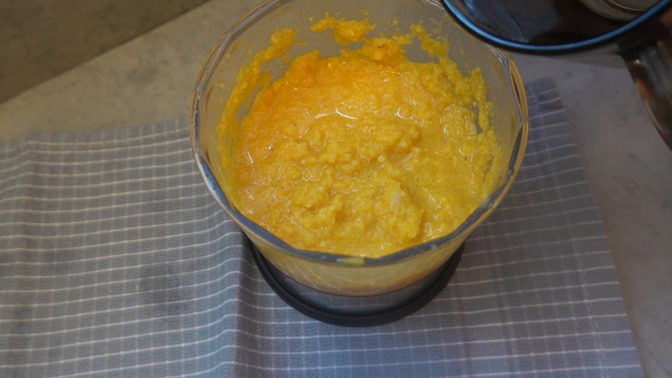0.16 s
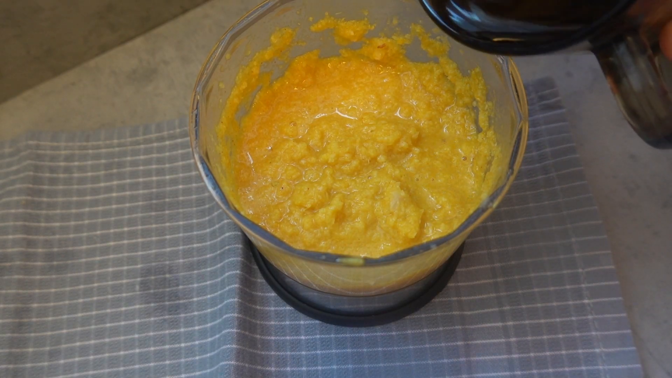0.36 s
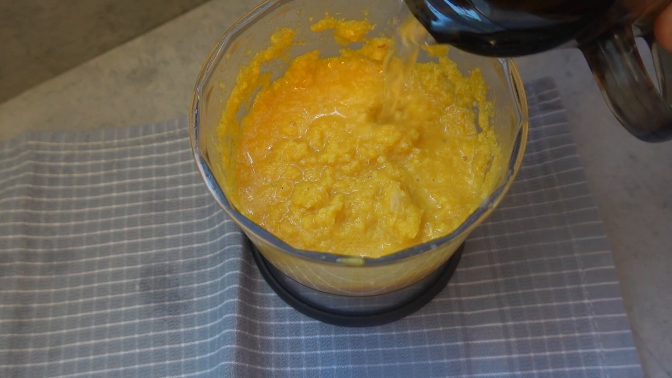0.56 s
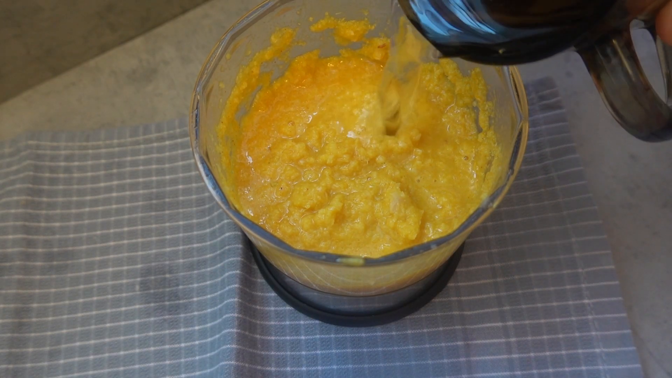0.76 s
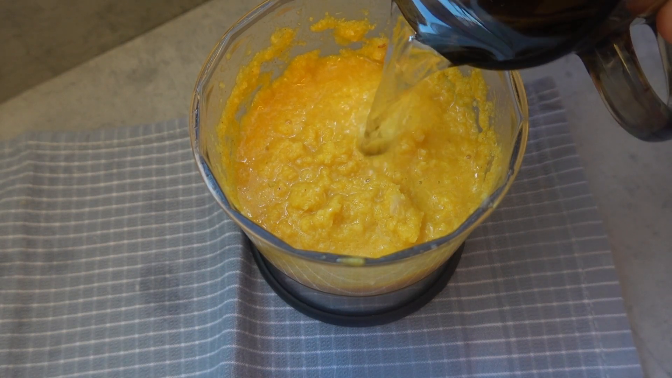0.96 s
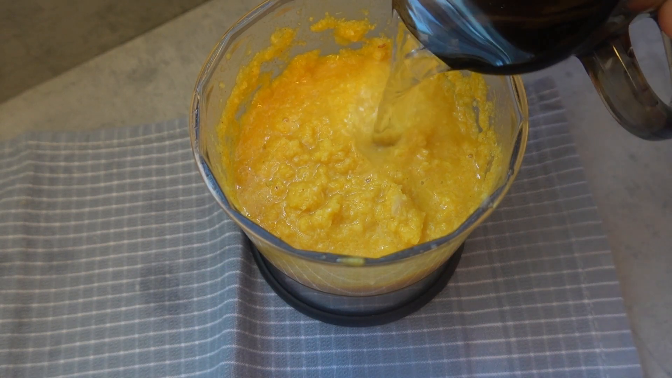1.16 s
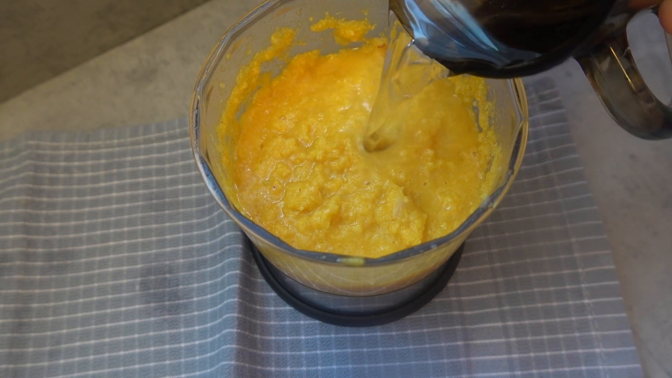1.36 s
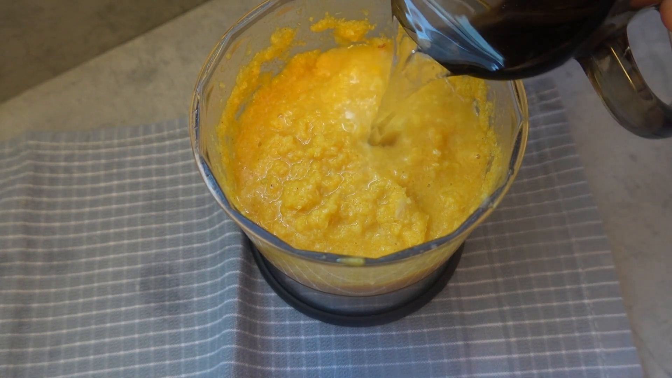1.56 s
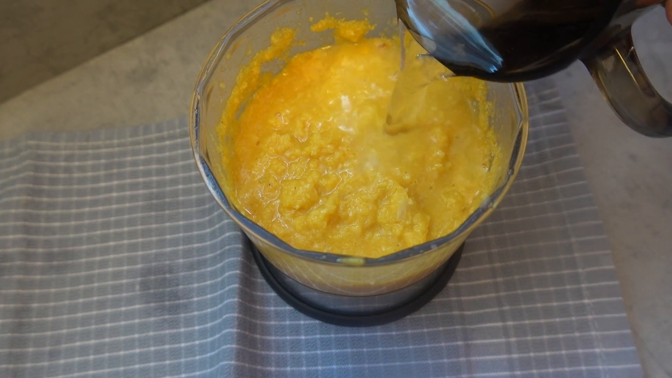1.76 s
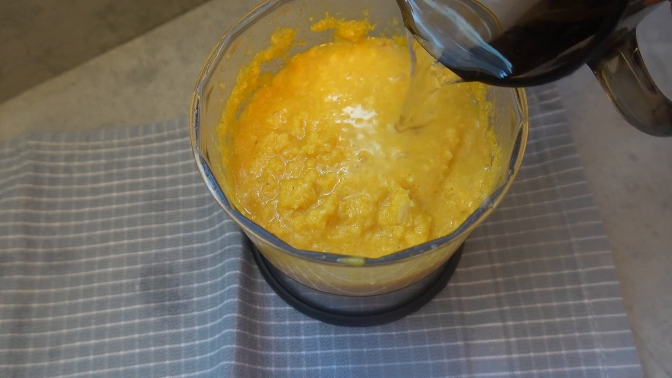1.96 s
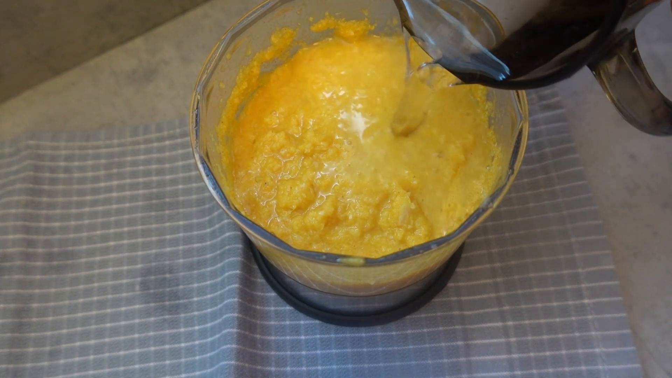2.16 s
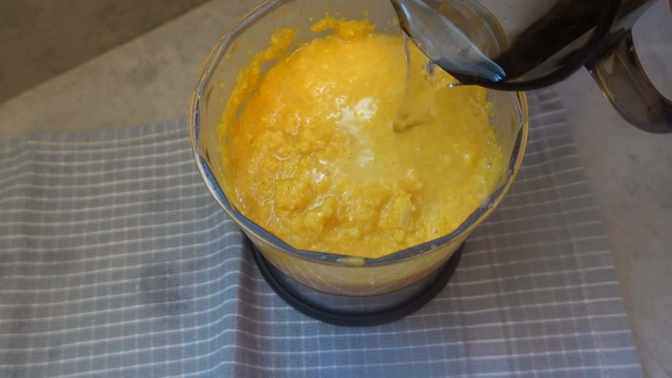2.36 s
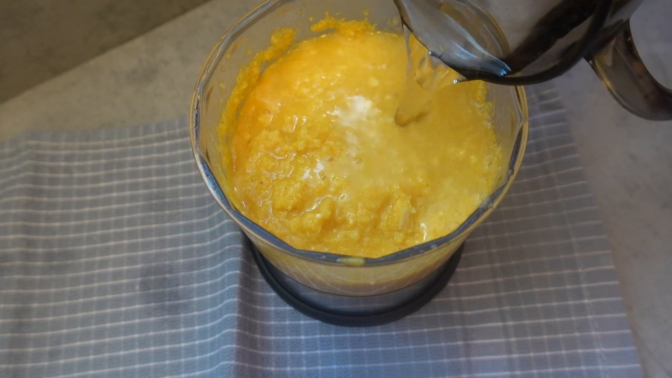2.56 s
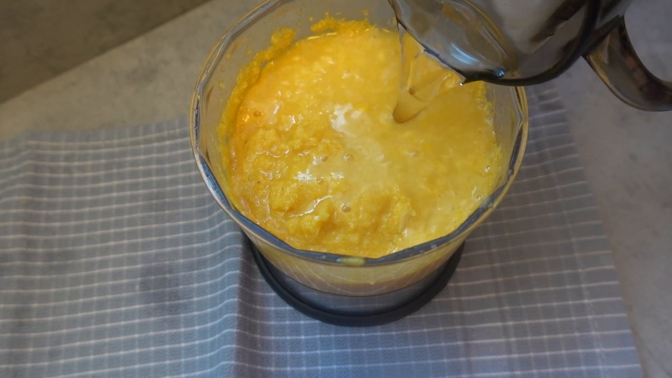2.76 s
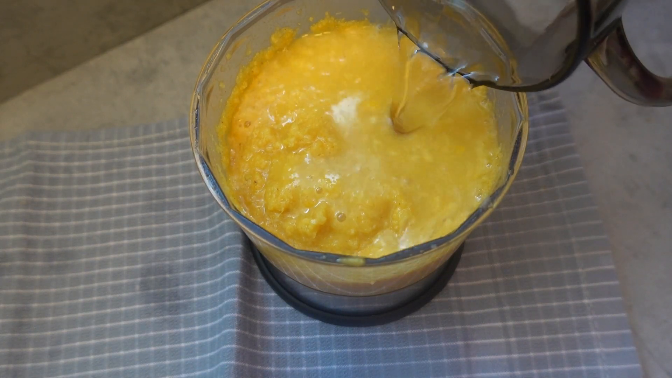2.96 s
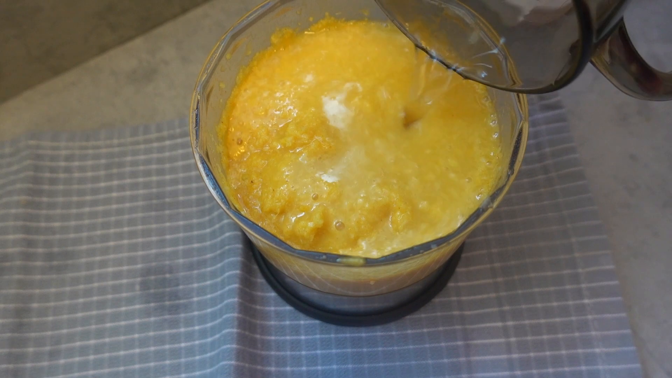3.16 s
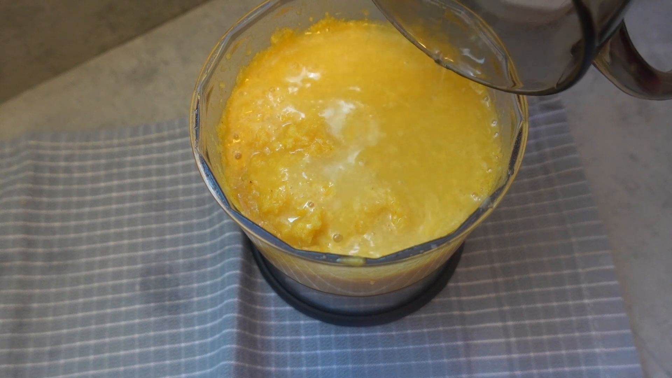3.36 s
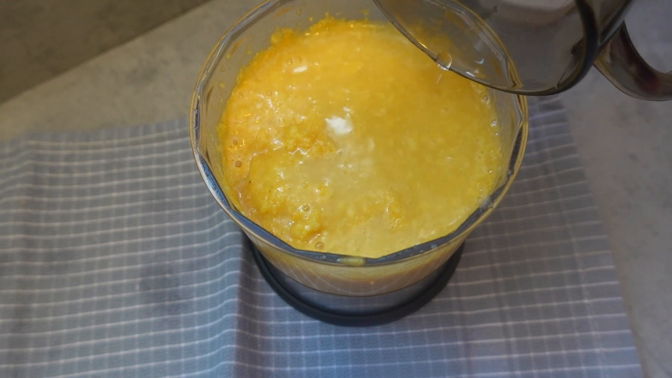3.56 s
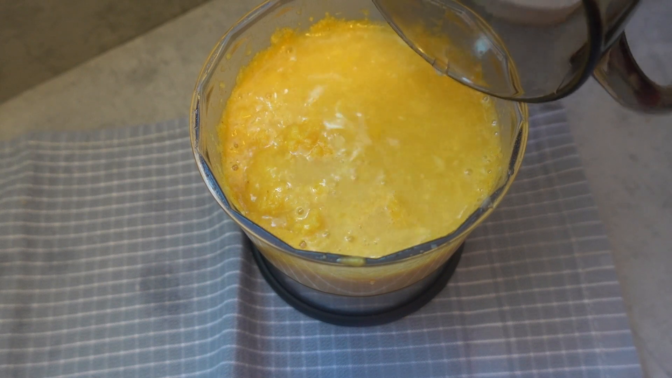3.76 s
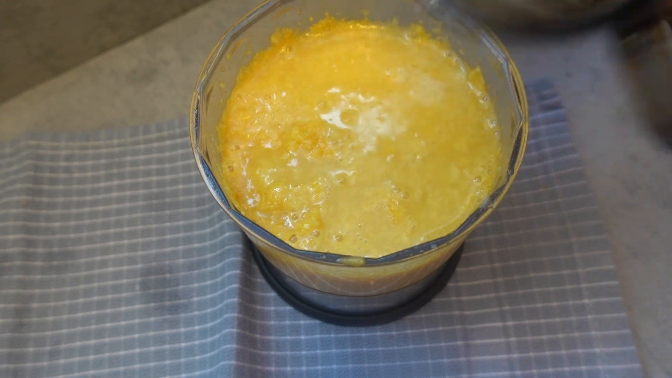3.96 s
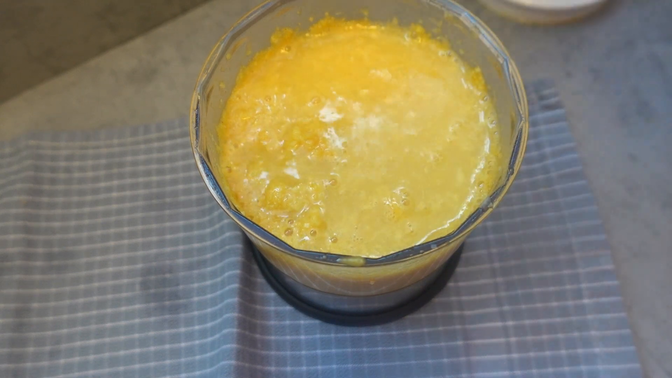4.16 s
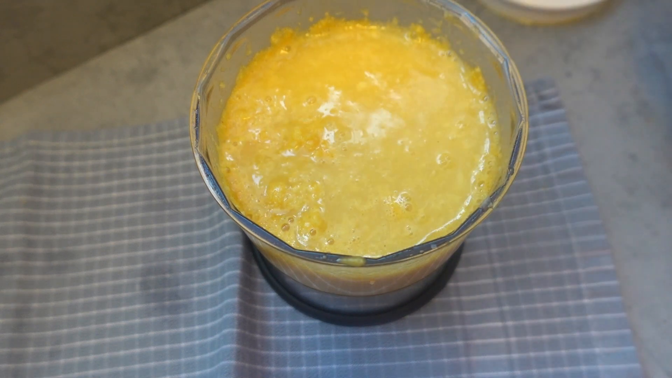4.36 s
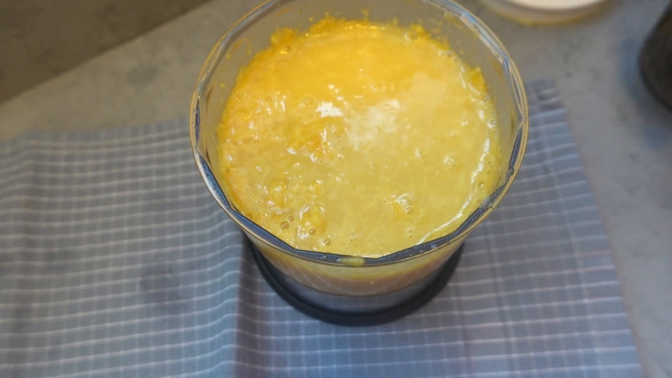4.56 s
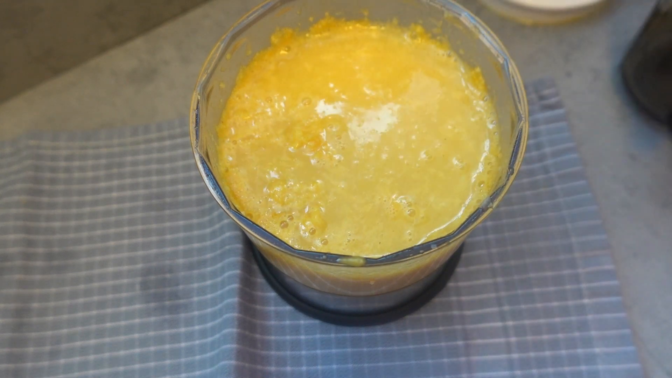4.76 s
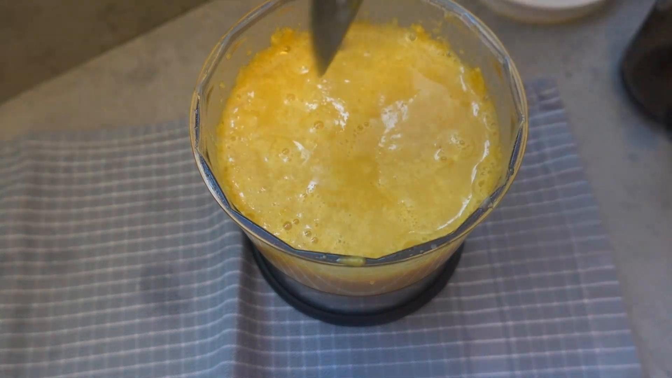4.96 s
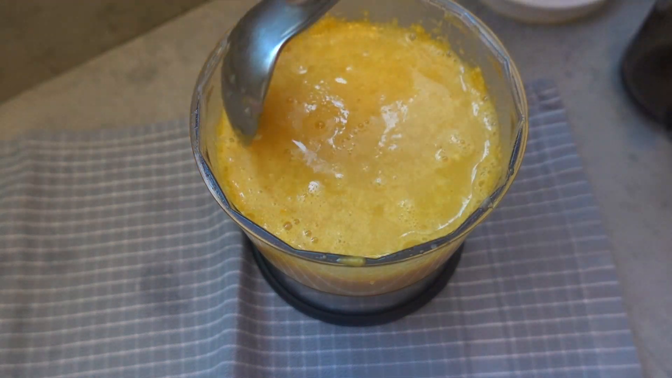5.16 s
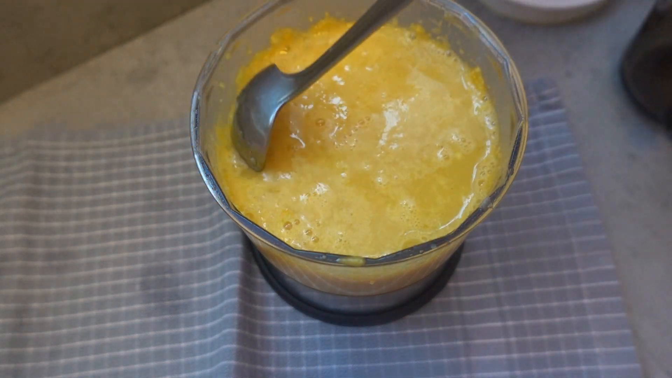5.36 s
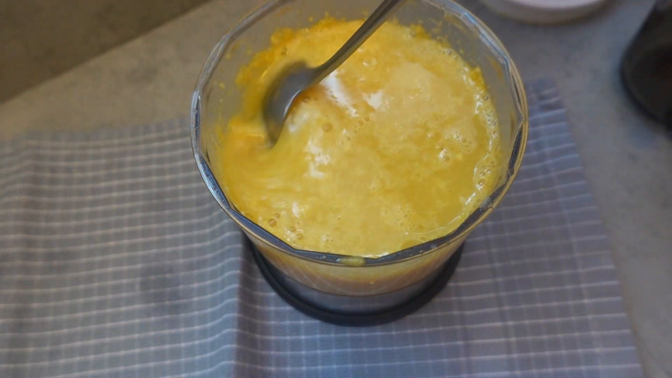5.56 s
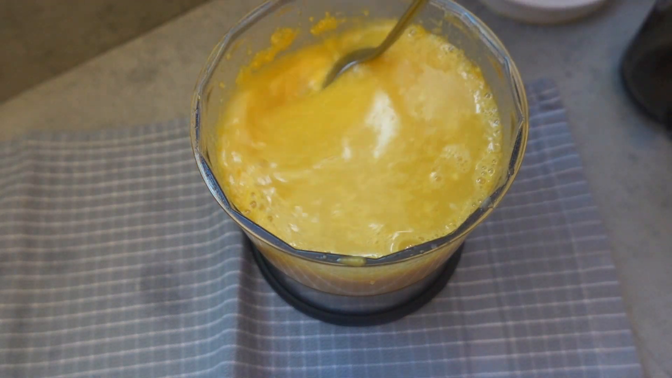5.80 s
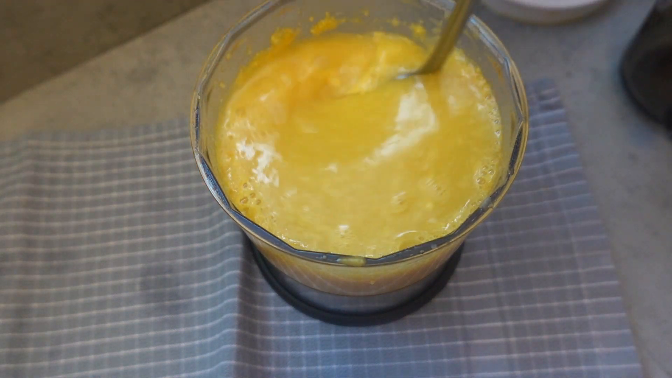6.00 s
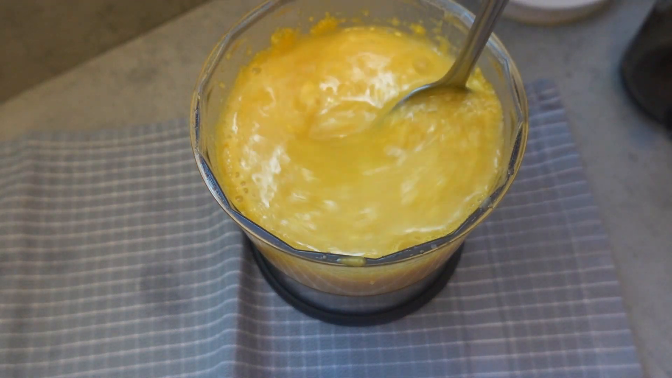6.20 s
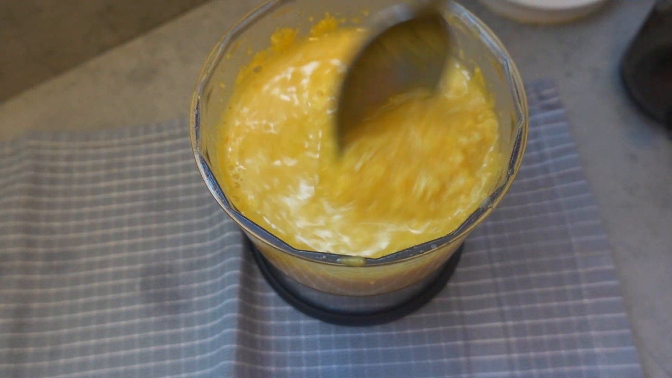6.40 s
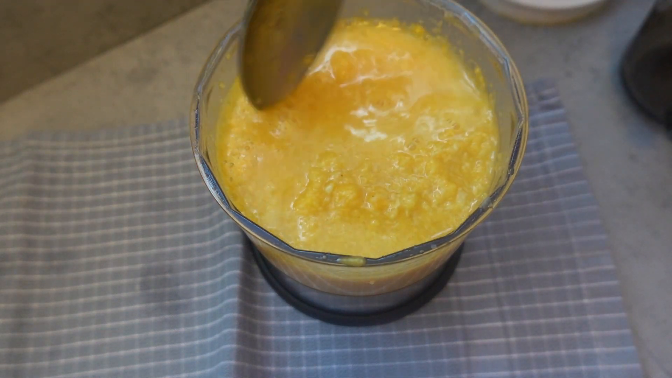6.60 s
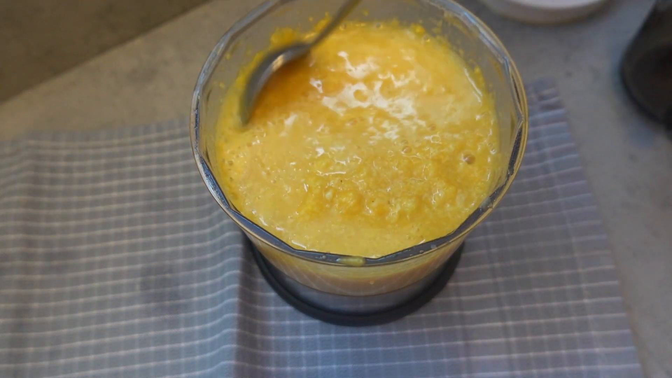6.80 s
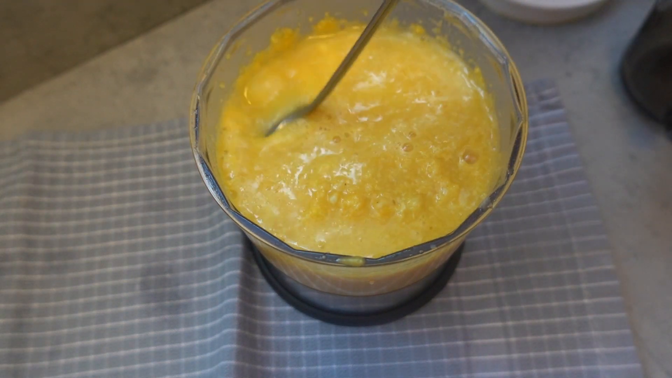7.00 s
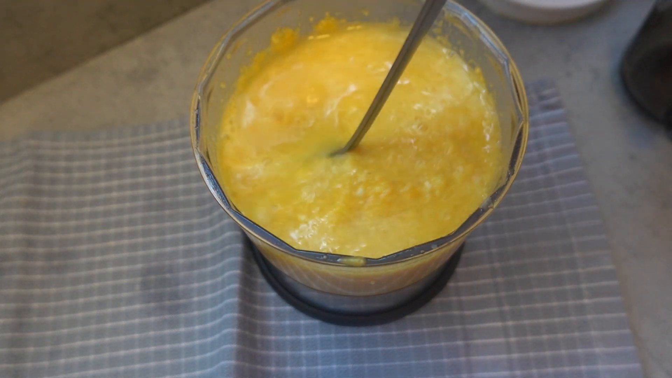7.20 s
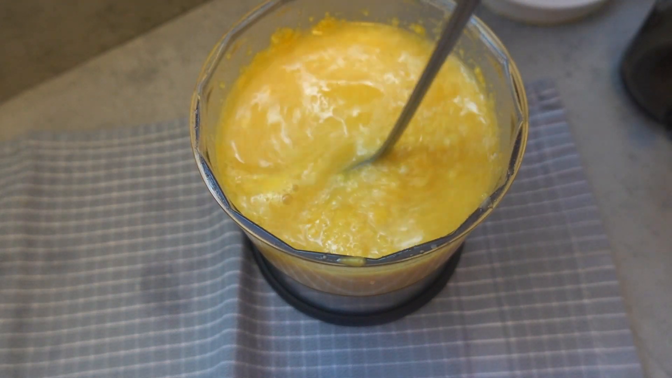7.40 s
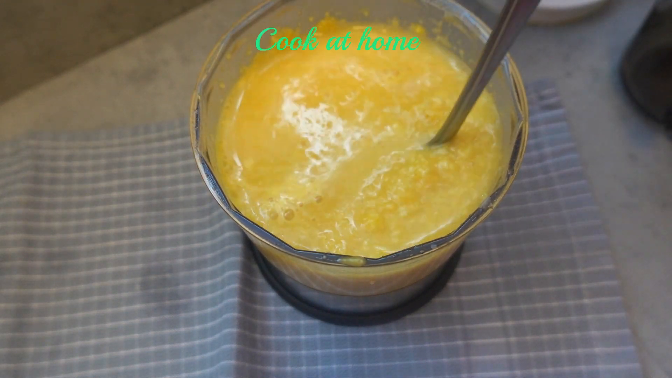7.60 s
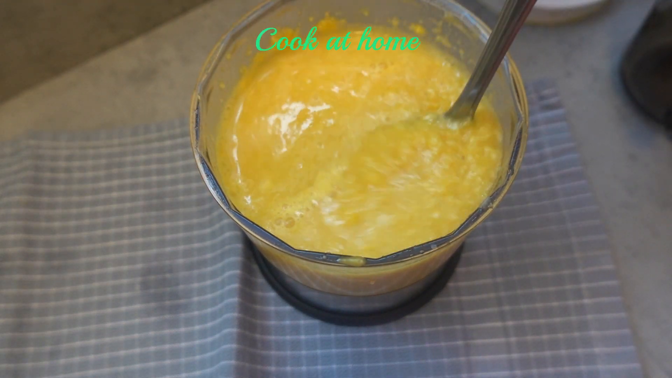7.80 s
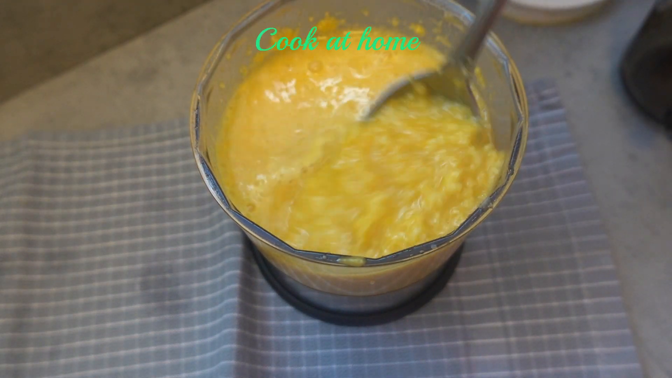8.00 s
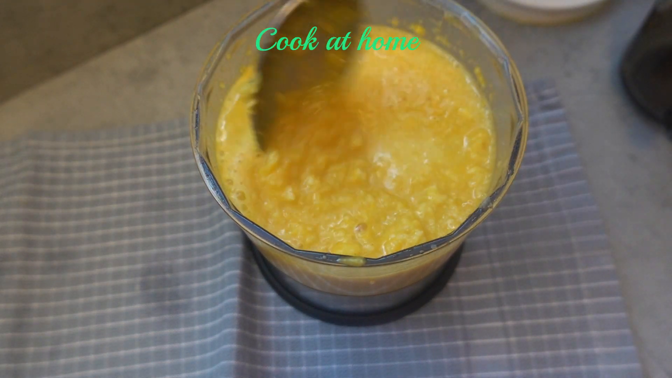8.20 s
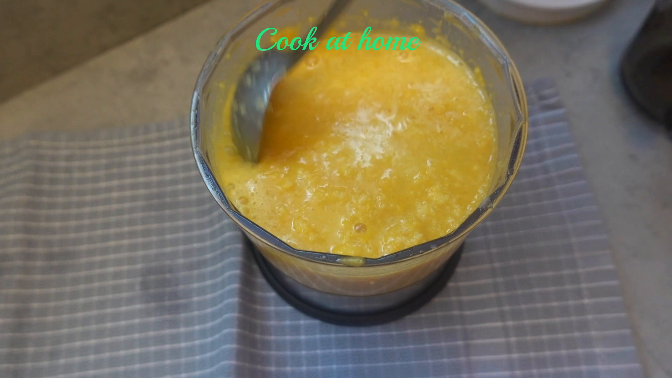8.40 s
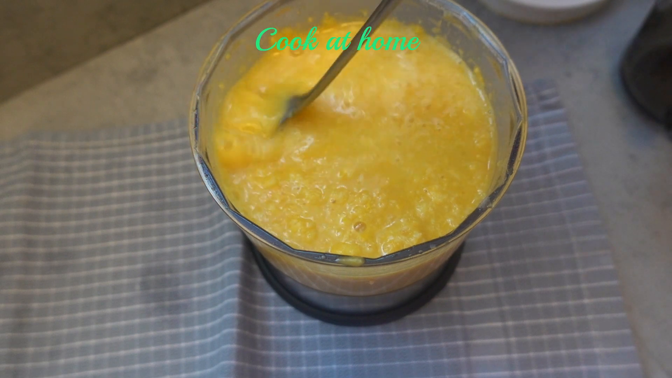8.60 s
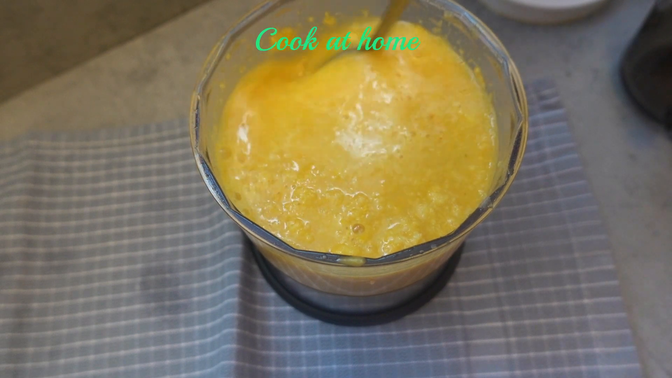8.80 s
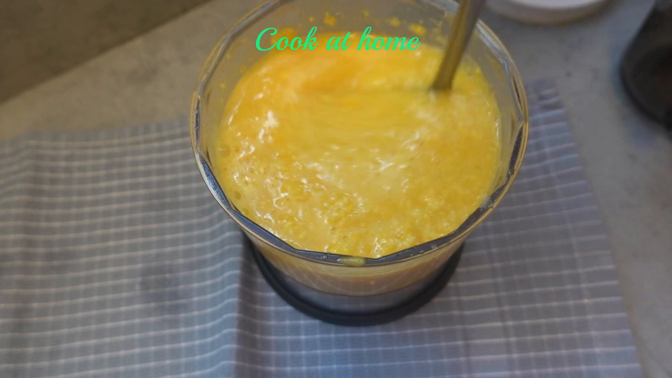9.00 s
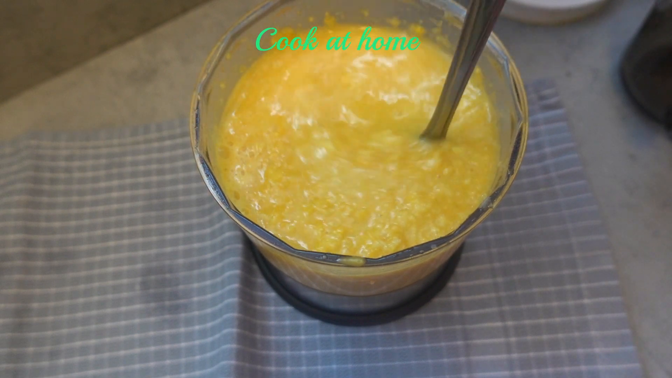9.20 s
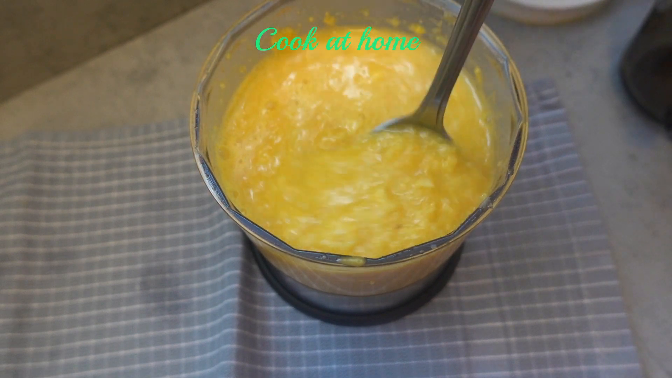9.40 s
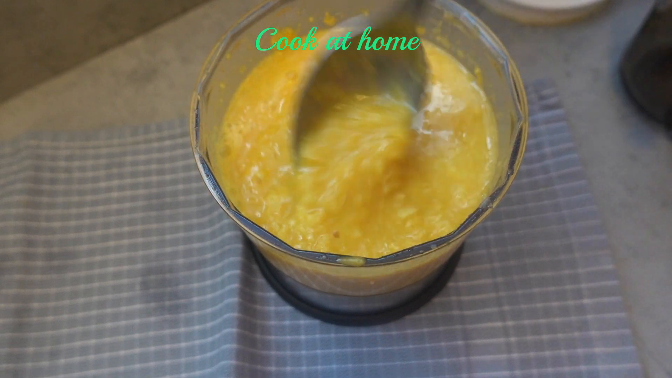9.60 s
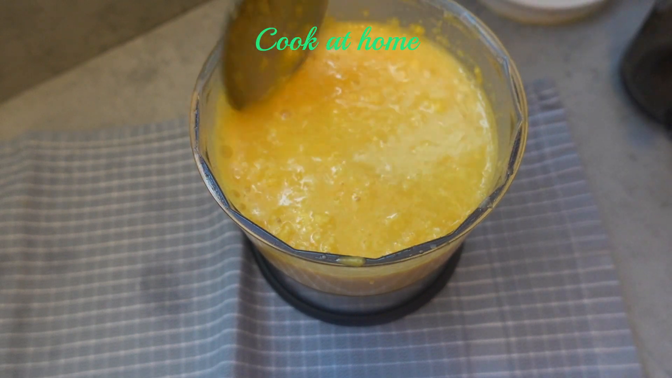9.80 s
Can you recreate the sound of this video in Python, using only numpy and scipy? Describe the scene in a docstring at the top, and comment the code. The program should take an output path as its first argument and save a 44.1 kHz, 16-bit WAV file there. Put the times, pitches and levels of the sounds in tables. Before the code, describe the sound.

A quiet kitchen with soft room noise, a low wavering hum and a barely audible high whine. At 0.3 s there is a small dull knock from a glass jug. From about 0.6 s water pours into thick puree: snapping drops, plops and low gurgles at first, then from 1.5 s brighter fizz and fine ticks, thinning after 3 s, with last drops at 3.5 and 3.9 s. Soft rustles come at 4.2 and 4.6 s. At 4.73 s the jug lands on the counter, a loud, hard, rattling double knock that ends abruptly by 4.9 s. From 5.6 s a spoon stirs with wet hiss, slosh and a squelchy gurgle near 6 s. Firm clunks and short rough scrapes cluster at 6.95-7.6 s, softer ones at 8.55-9.2 s, with small bubble pops between, and a last light tap at 9.8 s. Close microphone, short room echo.

```python
"""Water pours from a glass jug into a bowl of thick puree: splashes of snap, splat, bubble tone and wall
ring over fluttering fizz and slosh, with gurgles and singing made by pops and noise in gliding bands.
The jug meets the counter in rattling knocks: glass and counter modes, cracks and a shudder.
A steel spoon stirs, ringing the bowl's modes with bumps and with rough slips as it scrapes.
Soft rustles and a quiet kitchen of shaped noise, hum bands, a drone and a faint whine lie behind."""
import sys
import numpy as np
from scipy import signal
from scipy.fft import rfft, irfft, next_fast_len
from scipy.io import wavfile
from scipy.ndimage import uniform_filter1d

SR = 44100
rng = np.random.default_rng(int(sys.argv[2]) if len(sys.argv) > 2 else 0)


def dump(signal):
    """Clip the signal to [-1, 1] and save it as 16-bit WAV at the path in sys.argv[1]."""
    limited = np.clip(np.atleast_2d(signal).T, -1, 1)
    pcm = np.round(limited * 32767).astype(np.int16)
    wavfile.write(sys.argv[1], SR, pcm)


N = 434385
EDGE_HZ = 15950  # highest treble kept in the sound

# modes of the wet bowl wall: f/Hz, relative level/dB, t60/s at damping 1
WALL_MODES = [(1520, 8.5, 0.03), (2712, 7.5, 0.14), (2768, 2, 0.12), (4000, -12, 0.052)]
# spectrum of sloshing water, also used for the rustles: f/Hz, relative level/dB
SLOSH_SPECTRUM = [(180, -51), (300, -1.5), (554, 0), (712, -4.5), (1320, -9), (6000, -17), (7800, -50)]
# spectrum of a hard contact: f/Hz, relative level/dB
CRACK_SPECTRUM = [(300, -27), (900, 13.5), (1800, 10), (3500, 0), (6000, -20), (12000, -56)]
# left-right likeness of air and echoes: f/Hz, correlation (clipped to the valid range in use)
STEREO_LIKENESS = [(60, 1), (180, 0.84), (550, 0.44), (1650, -0.032), (4970, -0.35), (15000, 0.046)]


def splashes():
    """Drops snap, splat and trap ringing bubbles, and strike the wall; a pop is a bubble and noise only."""
    # splashes of the poured stream: t/s, level/dB, starting bubble f/Hz, then snap and splat
    # level/dB relative to the splash
    stream_drops = [(0.585, -42, 6350, -11, -16), (0.699, -51, 2450, 12, -22), (1.04, -48, 4800, -12, -9),
                    (1.104, -43, 1400, -13, -11), (0.615, -38, 1300, 0.5, -5.5), (0.762, -43, 2460, 0, -9),
                    (0.785, -40.5, 1260, -4, -15), (0.814, -42, 2600, -3, -5.5),
                    (0.851, -36.5, 2620, -7, -8.5), (0.851, -29, 1170, -30, -27),
                    (0.891, -38, 2620, -27, -25), (0.952, -27, 7940, -9, -26),
                    (1.004, -29.5, 8000, -9, -29), (1.131, -28, 940, -15, -26), (1.142, -33, 1360, -4, -24),
                    (1.145, -29.5, 4900, -25, -30), (1.159, -40, 1290, 5.5, -18),
                    (1.22, -37, 1410, -20, -23), (1.235, -34, 1320, -2.5, -16),
                    (1.273, -38, 2650, -29, -12), (1.305, -31, 1380, -30, -20),
                    (1.314, -37, 2670, -9, -4.5), (1.339, -30, 1400, -27, -19),
                    (1.39, -33.5, 5510, -21, -33), (1.492, -32, 4280, -20, -15),
                    (1.551, -25, 6800, -12, -26), (1.591, -26, 14400, -10, -20.5),
                    (1.694, -28, 11100, -8, -32), (1.781, -45, 2810, 4, -3), (2.078, -35, 2750, -2, -6.5),
                    (2.116, -25, 15400, -11, -18), (2.209, -45.5, 2660, -26, -3.5),
                    (2.258, -34, 4660, -18, -15), (2.291, -33, 5500, -9, -12.5),
                    (2.376, -36, 2750, -7, -18), (2.4, -31, 7540, -13, -39), (2.515, -27, 9500, -15, -41),
                    (2.535, -39, 2760, 2, -29), (2.576, -26, 14900, -7, -23), (2.639, -29, 11500, -9, -42),
                    (2.732, -26.5, 7700, -11, -36), (2.847, -46, 1920, 0, -34),
                    (2.932, -30, 14000, -18, -42), (3.26, -27, 14200, -17, -37),
                    (3.541, -19, 14200, -25, -54), (3.949, -30, 11300, -17, -39)]
    # bubbles popping as the mix settles or the spoon turns it: t/s, level/dB, starting bubble f/Hz
    lone_pops = [(3.996, -54.5, 865), (4.273, -46, 1540), (6.148, -49.5, 4600), (6.294, -54, 5090),
                 (6.334, -45.5, 5230), (6.625, -54, 4450), (6.8748, -49, 15500), (7.129, -38.5, 4760),
                 (7.154, -36.5, 3280), (7.3422, -44, 10500), (7.61, -42, 2160), (7.976, -50, 6100),
                 (8.043, -51.5, 4300), (8.405, -45, 3750), (8.8633, -41, 13700), (8.9111, -43.5, 3670),
                 (2.702, -56, 4700), (3.202, -56, 5870), (3.376, -54, 5200), (3.45, -56, 5730)]
    out = np.zeros((2, N))
    t = np.arange(600) / SR
    for s, db, hz, snap_db, splat_db in stream_drops:
        # the wall rings with the splat, more when the bubble is near its second mode
        octaves_off = np.log2(hz / WALL_MODES[1][0])
        ring_db = splat_db - 8.5 + 16 * np.exp(-(octaves_off / 0.22) ** 2)
        snap = evened(band(rng.standard_normal((2, len(t))), 8500, "high")) * np.exp(-t / .0015)
        splat = evened(band(rng.standard_normal(len(t)), [1100, 5500], "band")) * np.exp(-t / 0.002)
        add(out, s, amp(db) * (0.53 * bubble(hz, 3.0) + amp(snap_db) * snap + amp(splat_db) * splat))
        strike_db = 3 * rng.standard_normal(len(WALL_MODES))
        add(out, s, amp(db + ring_db) * ring(detuned(WALL_MODES), strike_db, 4.0, .06, 1e-4))
    for s, db, hz in lone_pops:
        burst = band(rng.standard_normal((2, len(t))), [hz / 2, min(2 * hz, EDGE_HZ)], "band")
        add(out, s, amp(db) * (bubble(hz, 5.4) + 0.74 * evened(burst) * np.exp(-t / 0.0025)))
    return out


def wet_surface():
    """Fizz and slosh: fluttering hiss, ticks and small bubbles; the stream's drops keep the wall ringing."""
    # balance of the wet surface: t/s, fizz of tiny bursting bubbles level/dB, slosh level/dB
    wet_levels = [(0, -74, -74), (.52, -71, -70.5), (.62, -64, -68), (1.0, -66, -67.5), (1.5, -63.5, -67),
                  (1.9, -59, -68.5), (2.6, -59.5, -70.5), (3.4, -62, -78), (4.85, -63, -64),
                  (4.93, -65.5, -69), (5.45, -67, -72.5), (5.6, -61, -69.5), (6.7, -61, -73),
                  (7.15, -56, -64), (7.5, -64, -66), (8.1, -61, -71.5), (8.3, -56, -73.5),
                  (8.8, -58.5, -62.5), (9.3, -62.5, -67), (9.85, -58.5, -77.5)]
    # how freely the surface bubbles: t/s, amount (0-1)
    bubbling_amount = [(0, 0), (.6, 0), (.8, 0.94), (2.9, 0.76), (3.75, 0.18), (9.85, 0.25)]
    # spectrum of the fizzing hiss: f/Hz, relative level/dB
    fizz_spectrum = [(1470, -40), (2500, -43), (2830, -9), (4120, -11), (7680, -5), (15700, -1.5)]
    t = np.arange(N) / SR
    fizz_db, slosh_db = curves(wet_levels, t)
    pour = np.clip(curves(bubbling_amount, t)[0], 0, 1)

    hiss = rng.standard_normal((2, N)) * clumps(2.8, 1200) + 0.41 * crackle(N, 120, 3.4)
    fine_bubbles = bubbling(3660, 14800, 600, 7)
    fine_drops = spatter(200, 7100, 9700, 0.0025)
    fizz = coloured(hiss, fizz_spectrum) + .5 * pour * (fine_bubbles + 0.64 * fine_drops)

    wall_ring = ring(WALL_MODES, np.zeros(len(WALL_MODES)), 1.9, .12, 1e-4)
    wall = evened(signal.oaconvolve(crackle(N, 400, 6.6), wall_ring)[:N])

    big_bubbles = bubbling(884, 5550, 1300, 4.5)
    big_drops = spatter(300, 930, 4300, 0.002)
    slosh = 1.28 * coloured(rng.standard_normal((2, N)), SLOSH_SPECTRUM)
    slosh = slosh + pour * (0.73 * big_bubbles + big_drops)
    return amp(fizz_db) * fizz + amp(-70.5) * pour ** 1.76 * wall + amp(slosh_db) * slosh


def gliding_bands():
    """Quick pops and noise drive a resonance whose pitch glides, heard as gurgles, fizz or singing."""
    # gurgles, trickles, rising fizz and singing of spoon scrapes, as gliding narrow bands: t/s, length/s,
    # level before the swell/dB, from f/Hz, to f/Hz, width of each resonance pass/Hz, least pop rate/(1/s)
    glides = [(0.756, 0.25, -63, 1600, 1870, 2200, 220), (1.111, 0.071, -63, 1000, 1300, 500, 250),
              (1.208, 0.17, -57.5, 1300, 1510, 900, 150), (1.24, 0.17, -61.5, 1780, 2590, 1800, 360),
              (1.434, 0.39, -65, 4230, 5000, 750, 290), (1.682, 0.39, -67, 5670, 6600, 900, 67),
              (2.114, 0.22, -65.5, 3900, 3870, 350, 150), (2.2, 0.73, -66, 6200, 9200, 1300, 55),
              (2.844, 0.052, -64.5, 1930, 1980, 500, 300), (5.954, 0.068, -51, 2910, 3600, 290, 570),
              (6.051, 0.13, -66.5, 4080, 4730, 600, 340), (6.122, .6, -70.5, 5100, 4900, 1900, 260),
              (6.311, .04, -69, 3400, 3300, 400, 300), (6.365, 0.05, -68, 3150, 3270, 350, 200),
              (6.461, 0.13, -64.5, 4500, 4680, 1300, 320), (6.616, 0.057, -63, 4600, 5200, 1400, 300),
              (7.92, 0.042, -60, 3250, 3360, 402, 150), (7.948, 0.63, -71.5, 4770, 4980, 1800, 93),
              (8.2, 0.16, -65, 3700, 3980, 700, 240), (8.417, 0.16, -73, 3300, 3300, 350, 300),
              (8.799, 0.26, -67, 1840, 1980, 300, 330), (8.927, 0.052, -54.5, 2880, 2490, 800, 330)]
    out = np.zeros(N)
    for s, length, db, from_hz, to_hz, width, per_s in glides:
        t, shape_db = swell(length, 0.39, -4.5, -11.5)
        hz = from_hz + (to_hz - from_hz) * (t / length) ** 0.69
        pops = crackle(len(t), max(per_s, 8 / length), 3.4)  # about eight pops or more per glide
        drive = pops + 0.28 * rng.standard_normal(len(t))
        glide = resonate(resonate(drive, hz, width), hz, width)
        add(out, s, amp(db + shape_db) * evened(glide) * signal.windows.tukey(len(t), .05))
    return out


def jug():
    """The base lands, rocks and lands again; each contact rings, cracks and sets the counter shuddering."""
    # jug meeting the counter: t/s, level/dB, contact f/Hz, then crack, glass ring and counter shudder
    # level/dB relative to the contact, damping factor
    contacts = [(0.3296, -24, 404, -15, -12.5, -28, 1.2), (4.7294, -10, 500, -10.5, -33, -11, 1.95),
                (4.7329, -11, 410, -29, -41, -14.5, 2.1), (4.7738, -12, 393, -11.5, -33, -14, 3.1),
                (4.7783, -14, 454, -29, -36, -19, 2.9), (4.799, -21.5, 523, -30, -38, -20, 2),
                (4.849, -37, 299, -2, -33, -7, 2.4)]
    # modes of counter and glass: f/Hz, relative level/dB, t60/s at damping 1
    jug_modes = [(158, 5, 0.12), (235, 6.5, 0.052), (341, 5, 0.045), (424, 11, 0.044), (650, -6, 0.12),
                 (700, -16, 0.044), (820, 3, 0.028), (920, 0.5, 0.053), (1300, -9, 0.028), (1980, -12, 0.1),
                 (2092, -8, 0.25), (4380, -22.5, 0.13), (6100, -10, 0.008)]
    # tone of the counter and what stands on it shuddering after a landing: f/Hz, relative level/dB
    shudder_spectrum = [(48, -13), (72, -31), (140, -1), (270, -5), (480, -4), (620, 4.5), (720, -5.5),
                        (930, 3.5), (1250, -11), (1610, -26), (2080, -16), (8000, -81)]
    out = np.zeros(N)
    modes_hz = np.transpose(jug_modes)[0]
    t = np.arange(9000) / SR
    for s, db, hz, crack_db, glass_db, shudder_db, damping in contacts:
        # below 1500 Hz, modes near the contact pitch are favoured
        gains_db = np.where(modes_hz > 1500, glass_db, -10 * abs(np.log2(modes_hz / hz)))
        add(out, s, amp(db) * band(ring(jug_modes, gains_db, damping, 0.35, 0.003), 99, "high"))
        add(out, s + 0.001113, amp(db + crack_db) * crack(0.0023))
        fade = (1 - np.exp(-t / 0.0019)) * amp(-60 * t / 0.18)
        jolts = crackle(len(t), 1500, 3.3)
        # the jolts keep the glass buzzing
        buzz = resonate(jolts, 2060, 130)
        buzz = buzz + 0.33 * resonate(jolts, 2780, 150) + 0.15 * resonate(jolts, 3400, 300)
        glass = amp(-32) * evened(buzz)
        add(out, s, amp(db + shudder_db) * fade * (coloured(jolts, shudder_spectrum) + glass))
    return band(out, 47, "high")


def spoon():
    """A bump is a dull thud, a crack and the modes near the contact pitch; a drag feeds them rough slips."""
    # spoon against the bowl: t/s, level/dB, contact f/Hz, upper mode level/dB,
    # crack level relative to the bump/dB, damping factor
    bumps = [(5.797, -30.5, 396, -27, -40, 0.91), (6.808, -25, 637, -20.5, -14, 1.7),
             (6.953, -13.5, 408, -13, -11, 0.72), (7.128, -26.5, 390, -14, -13, 2.8),
             (7.154, -14.5, 472, -13.5, -22, 2.2), (7.2, -15.5, 423, -8, -14, 4.7),
             (7.298, -36.5, 694, 16, -1.5, 1.7), (7.424, -32, 504, -20, -32, 0.85),
             (7.479, -13, 560, -15, -12, 1.13), (7.492, -25, 530, -31, -24, 1.1),
             (7.579, -15.5, 480, -12, -18.5, 2), (8.56, -24, 455, -43, -16.5, 1.3),
             (8.655, -23, 490, -17.5, -26, 1.3), (8.674, -26, 530, -24, -29, 1.6),
             (8.747, -25, 490, -32, -31, 0.7), (8.785, -37.5, 420, -17, -23, 2.4),
             (8.854, -34, 530, -28.5, -37, 0.59), (8.876, -31, 417, -19, -20, 1.6),
             (8.94, -32, 408, 3, -13, 0.51), (8.954, -38, 450, -2, -26, 1.4),
             (9.032, -29.5, 478, -18.5, -17, 0.5), (9.036, -28, 710, -27, -32, 2.9),
             (9.201, -28.5, 463, -22.5, -36, 1.16), (9.811, -28.5, 668, -27, -1, 1.1)]
    # spoon dragging along the wall: t/s, length/s, share of the length where it presses hardest,
    # then body, grit and singing edge level/dB before the pressure swell
    scrapes = [(6.979, 0.1, 0.49, -39, -65, -68), (7.205, 0.092, 0.18, -42.5, -59, -82),
               (7.513, 0.15, 0.36, -41.5, -60, -68), (8.575, 0.12, 0.49, -50, -85, -85),
               (8.67, 0.2, 0.38, -43.5, -66.5, -63), (8.899, 0.087, 0.75, -42.5, -59, -63),
               (9.215, 0.074, 0.4, -50, -66, -77)]
    # modes of the bowl: f/Hz, relative level/dB, t60/s at damping 1
    bowl_modes = [(379, 4.5, 0.085), (437.4, 12.5, 0.059), (488.4, 10, 0.092), (525.6, 4, 0.13),
                  (600, -2, 0.13), (718, 0, 0.075), (911, 23.5, 0.032), (998, 8, 0.075), (1060, 10, 0.026),
                  (1380, 3.5, 0.053), (1750, 6.5, 0.021), (1900, 8, 0.025), (2460, 5, 0.011),
                  (3316, -9, 0.041)]
    out = np.zeros(N)
    modes_hz, modes_db, _ = np.transpose(bowl_modes)
    low = modes_hz < 750
    # upper modes only, evened out in level
    rattle = ring(bowl_modes, np.where(low, -60, -.55 * modes_db), 0.74, .1, 0.00024)
    fade = np.exp(-np.arange(0, .15, 1 / SR) / 0.022)
    for s, db, hz, upper_db, crack_db, damping in bumps:
        gains_db = np.where(low, -24 * abs(np.log2(modes_hz / hz)), upper_db)
        gains_db = gains_db + 3.0 * rng.standard_normal(len(bowl_modes))
        add(out, s, amp(db - 4.0) * ring(detuned(bowl_modes), gains_db, damping, .2, 0.0023))
        thud = ring([(hz, 0, .025)], np.zeros(1), 0.66, .05, 0.0017)
        add(out, s, amp(db - 6.5) * thud)
        # steel meets glass once the puree is squeezed out
        add(out, s + 0.001497, amp(db + crack_db) * crack(0.0028))
        # the loose spoon keeps the upper modes ringing
        chatter = evened(signal.oaconvolve(crackle(len(fade), 1500, 3.3), rattle)[:len(fade)])
        add(out, s, amp(db + crack_db - 20.5) * fade * chatter)

    body_ring = ring(bowl_modes, np.where(low, 0, -21), 1.13, .1, 0.0021)
    for s, length, top, body_db, grit_db, sing_db in scrapes:
        t, press_db = swell(length, top, -13.5, -18.5)
        edge_press_db = 0.57 * press_db  # grit and singing follow the pressure less than the body does
        slips = crackle(len(t), 700, 4.5)
        body = evened(signal.oaconvolve(slips, body_ring)[:len(t)])
        grit = 0.2 * coloured(slips, CRACK_SPECTRUM) + evened(signal.oaconvolve(slips, rattle)[:len(t)])
        sing = evened(resonate(slips, modes_hz[-1], 490))  # the top mode sings under the edge
        drag = amp(body_db + press_db) * body + amp(grit_db + edge_press_db) * grit
        drag = drag + amp(sing_db + edge_press_db) * sing
        add(out, s, drag * signal.windows.tukey(len(t), .15))
    return band(out, 170, "high")  # a small bowl radiates no deep bass


def rustles():
    """Short swells of soft noise."""
    # soft rustles just before and around the jug's landing: t/s, length/s, level before the swell/dB
    soft_swells = [(4.239, .11, -55), (4.552, 0.38, -56.5)]
    out = np.zeros((2, N))
    for s, length, db in soft_swells:
        t, shape_db = swell(length, 0.42, -11.0, -10)
        add(out, s, amp(db + shape_db) * coloured(rng.standard_normal((2, len(t))), SLOSH_SPECTRUM))
    return out


def kitchen_air():
    """Broad room noise, alike on both sides in the bass, with hum bands, a drone and a whine."""
    # spectrum of the room noise: f/Hz, relative level/dB
    air_spectrum = [(21, -40), (35, -1), (102, -1), (162, 0.5), (209, -1.5), (263, -2.5), (450, -12.5),
                    (567, -8.5), (751, -20.5), (1580, -18.5), (14500, -25), (15700, -33)]
    # steady fuzzy hum bands: f/Hz, width of each resonance pass/Hz, level/dB
    hum_bands = [(116.1, 22, -67), (555.6, 57, -70), (937, 48, -82)]
    # a wavering low drone: t/s, level/dB
    drone_levels = [(0, -56), (3.4, -60), (4.2, -63), (5.0, -69.5), (9.85, -59.5)]
    # a faint high whine: from t/s, to t/s, f/Hz, level/dB
    whines = [(1.707, 2.05, 11300, -83), (3.78, 4.902, 11300, -78), (5.5, 5.974, 11300, -77)]
    hz = np.fft.rfftfreq(N, 1 / SR)
    same = np.clip(read(STEREO_LIKENESS, hz), -1, 1)
    a, b = rfft(rng.standard_normal((2, N)))
    sides = np.array([a, same * a + np.sqrt(1 - same ** 2) * b])
    air = coloured(irfft(sides, N), air_spectrum)

    drone_db = curves(drone_levels, np.arange(N) / SR)[0]
    hum = np.zeros(N)
    for f, width, db in hum_bands + [(211, 17.3, drone_db)]:
        hum += amp(db) * evened(resonate(resonate(rng.standard_normal(N), f, width), f, width))
    for start, end, f, db in whines:
        noise = rng.standard_normal(round((end - start) * SR))
        whine = evened(resonate(noise, f, 160))
        add(hum, start, amp(db) * whine * signal.windows.tukey(len(noise), .2))
    return amp(-62) * air + hum


def room(x):
    """Sparse echoes of random sign, each band dying at its own speed."""
    # decay of the kitchen: f/Hz, t60/s
    kitchen_decay = [(100, 0.81), (400, 0.2), (1500, 0.32), (5000, 0.28), (14000, 0.18)]
    taps = np.zeros((2, SR // 2))
    at = np.arange(300, SR // 2 - 20, 20)
    at = at + rng.integers(0, 20, (2, len(at)))
    np.put_along_axis(taps, at, rng.choice([-1., 1.], at.shape), 1)
    hz, t, z = signal.stft(taps, SR, nperseg=256)
    same = np.clip(read(STEREO_LIKENESS, hz), 0, 1)[:, None] ** 0.12
    z = np.array([z[0], same * z[0] + np.sqrt(1 - same ** 2) * z[1]])
    decay = amp(-60 * t / read(kitchen_decay, hz)[:, None])
    tail = signal.istft(z * decay, SR, nperseg=256)[1]
    return signal.fftconvolve(x[None], tail / np.linalg.norm(tail[0]), axes=1)[:, :N]


def bubble(hz, cycles):
    """A short rising tone, dying over some cycles; the two sides hear it with a small random shift."""
    t = np.arange(600) / SR
    shift = rng.uniform(-0.52, 1, (2, 1)) * hz / 5000
    tone = np.sin(2 * np.pi * hz * t * (1 + 4 * t) + shift)
    return tone * np.exp(-t * hz / cycles) * np.minimum(t * hz, 1)


def bubbling(lo_hz, hi_hz, per_s, cycles, count=14):
    """Random small bubbles of many sizes, coming in clumps; rms 1."""
    rate = per_s * clumps(4.9, 1500) / count
    total = np.zeros((2, N))
    for hz in np.geomspace(lo_hz, hi_hz, count):
        train = crackle(N, rate, 7.0)
        total += signal.oaconvolve(train[None], bubble(hz, cycles))[:, :N] * np.sqrt(hz)
    return evened(total)


def spatter(per_s, lo_hz, hi_hz, decay_s):
    """Tiny drops landing: broad ticks in clumps, each side with its own grain; rms 1."""
    t = np.arange(300) / SR
    ticks = band(rng.standard_normal((6, 2, len(t))), [lo_hz, hi_hz], "band") * np.exp(-t / decay_s)
    rate = per_s * clumps(4.9, 2500) / len(ticks)
    total = np.zeros((2, N))
    for tick in ticks:
        train = crackle(N, rate, 5.9)
        total += signal.oaconvolve(train[None], tick + 0.5 * tick.mean(0))[:, :N]
    return evened(total)


def crack(decay_s):
    """A few milliseconds of hard, broad contact noise; peak 1."""
    t = np.arange(1024) / SR
    x = coloured(rng.standard_normal(len(t)), CRACK_SPECTRUM) * np.exp(-t / decay_s)
    return x / abs(x).max()


def crackle(shape, per_s, spread_db):
    """Sparse clicks of random sign, a few of them large; rms 1."""
    size = amp(spread_db * np.minimum(rng.exponential(1, shape), 5))
    return evened(size * rng.choice([-1., 1.], shape) * (rng.random(shape) < per_s / SR))


def ring(modes, gains_db, damping, seconds, rise):
    """Modes that start together and die away; peak 1."""
    t = np.arange(round(seconds * SR)) / SR
    hz, db, t60 = np.transpose(modes)[:, :, None]
    level_db = db + gains_db[:, None] - 60 * t * damping / t60
    x = (amp(level_db) * np.sin(2 * np.pi * hz * t)).sum(0)
    x = x * (1 - np.exp(-t / rise))
    return x / abs(x).max()


def detuned(modes):
    """The wet load shifts each mode a little by chance from blow to blow."""
    return [(hz * (1 + 0.034 * rng.standard_normal()), db, t60) for hz, db, t60 in modes]


def resonate(x, hz, width):
    """Shifts the curve hz down to zero, smooths, and shifts back: a resonance of gain 1."""
    turn = np.exp(2j * np.pi * np.cumsum(hz * np.ones(x.shape[-1])) / SR)
    r = np.exp(-np.pi * width / SR)
    return 2 * (turn * signal.lfilter([1 - r], [1, -r], x / turn)).real


def coloured(x, spectrum):
    """Filters x by the spectrum, at rms 1."""
    size = next_fast_len(x.shape[-1])
    gain = amp(read(spectrum, np.fft.rfftfreq(size, 1 / SR)))
    return evened(irfft(rfft(x, size) * gain, size)[..., :x.shape[-1]])


def band(x, hz, kind):
    """A second-order Butterworth filter design."""
    return signal.sosfilt(signal.butter(2, hz, kind, fs=SR, output="sos"), x)


def clumps(depth_db, width):
    """Slow random swelling, as a gain; width is in samples."""
    slow = uniform_filter1d(uniform_filter1d(rng.standard_normal(N), width), width)
    return amp(depth_db * evened(slow))


def swell(length, top, start_db, end_db):
    """Times, and a level in dB that climbs to zero at the share top of the length and falls again."""
    t = np.arange(0, length, 1 / SR)
    return t, np.interp(t / length, [0, np.clip(top, 0, 1), 1], [start_db, 0, end_db])


def amp(db):
    """Decibels to a gain."""
    return 10 ** (np.asarray(db) / 20)


def evened(x):
    """Scales x to rms 1."""
    return x / np.sqrt(np.mean(x ** 2) + 1e-20)


def read(points, hz):
    """Reads a curve drawn over log frequency."""
    f, value = np.transpose(points)
    return np.interp(np.log(hz + 1), np.log(f + 1), value)


def curves(rows, t):
    """Reads each column of a table over time."""
    s, *columns = np.transpose(rows)
    return [np.interp(t, s, c) for c in columns]


def add(mix, s, sound):
    """Adds the sound into the mix from s seconds on."""
    part = mix[..., round(s * SR):][..., :sound.shape[-1]]
    part += sound[..., :part.shape[-1]]


def scene():
    """Balances pour, jug and bowl with their echoes over the surface, the rustles and the kitchen."""
    water = splashes()
    bowl = spoon() + gliding_bands()
    knock = jug()
    knock = knock + amp(-7) * room(knock)
    t = np.arange(N) / SR
    knock = knock * np.clip((4.905 - t) / 0.00083, 0, 1)  # the knock's tail stops abruptly
    wet = water + amp(-10.5) * room(water.mean(0)) + wet_surface()
    bowl = bowl + amp(-9.0) * room(bowl)
    return wet + knock + bowl + rustles() + kitchen_air()


def record(dry):
    """A steep low-pass removes the treble above EDGE_HZ."""
    lowpass = signal.firwin(511, EDGE_HZ, window=("kaiser", 9), fs=SR)
    return signal.oaconvolve(dry, lowpass[None], "same")


dry = scene()
out = record(dry)
dump(out)
```